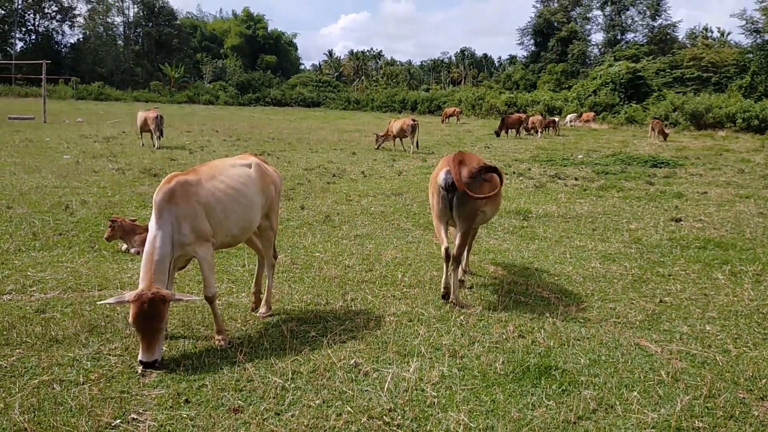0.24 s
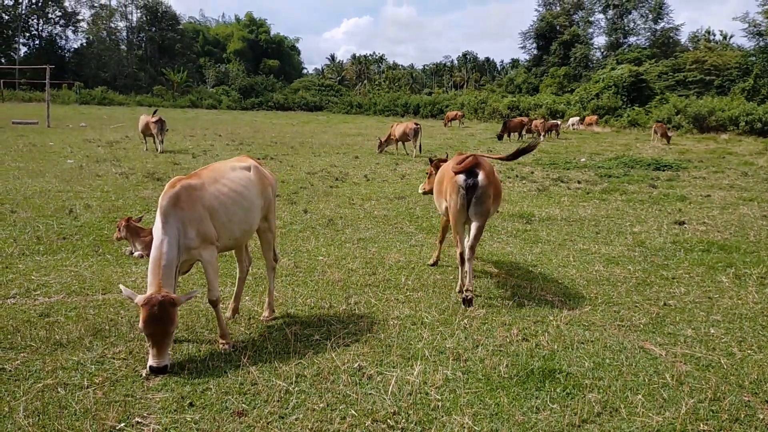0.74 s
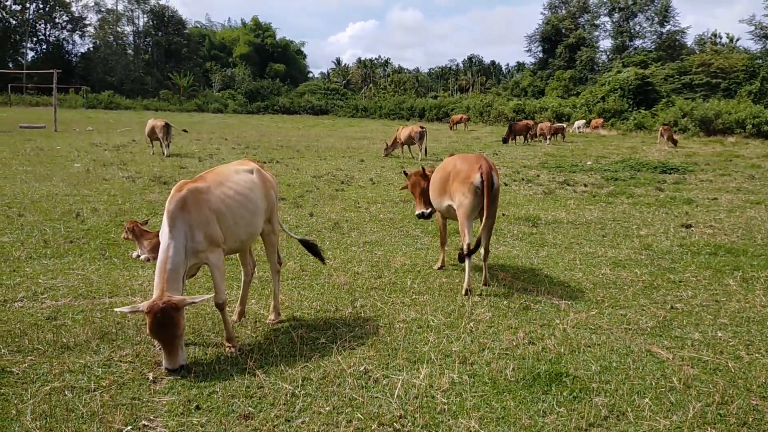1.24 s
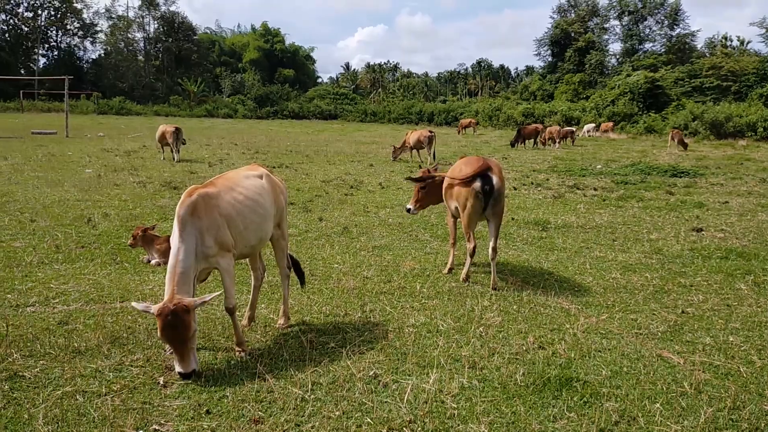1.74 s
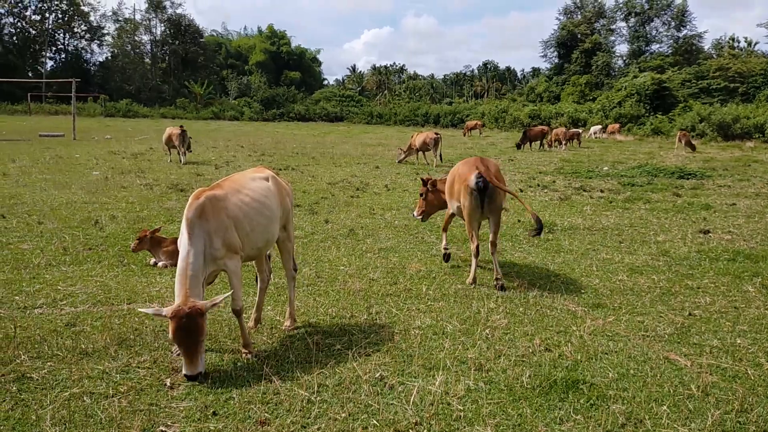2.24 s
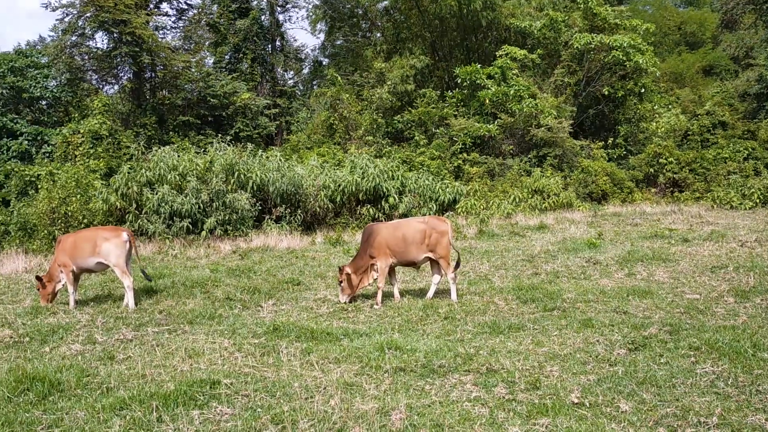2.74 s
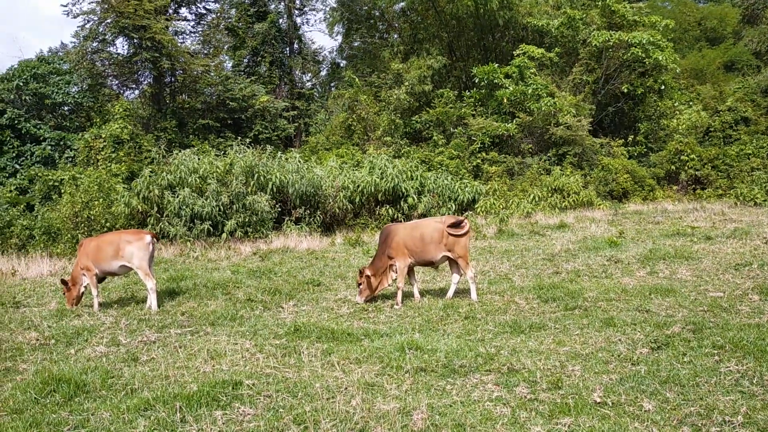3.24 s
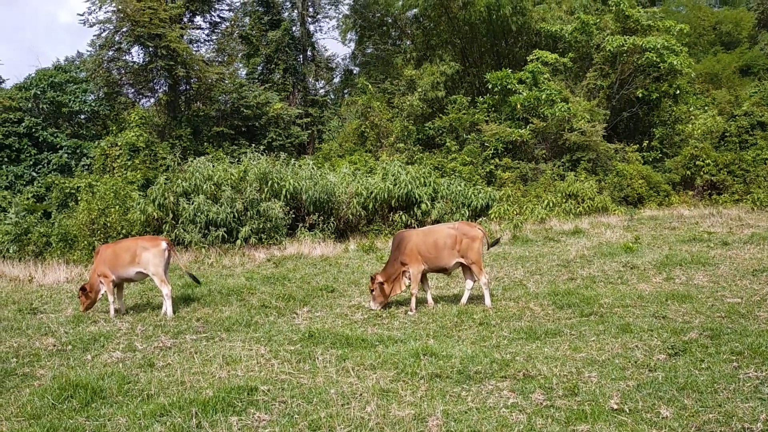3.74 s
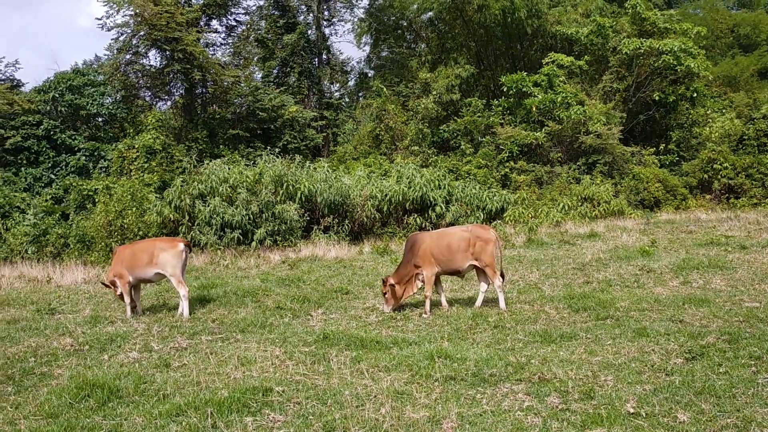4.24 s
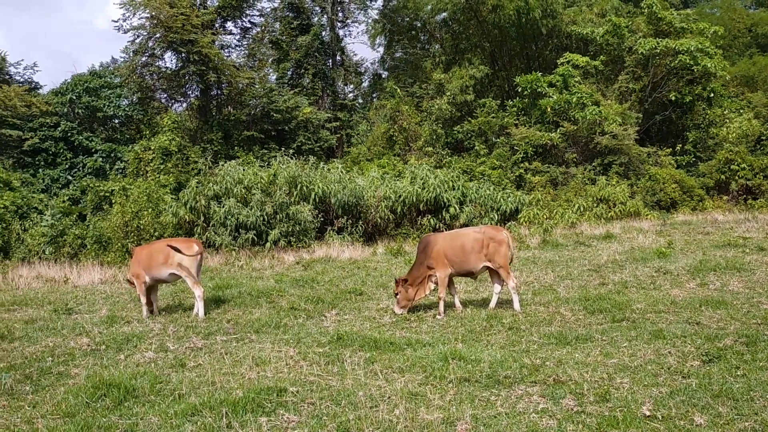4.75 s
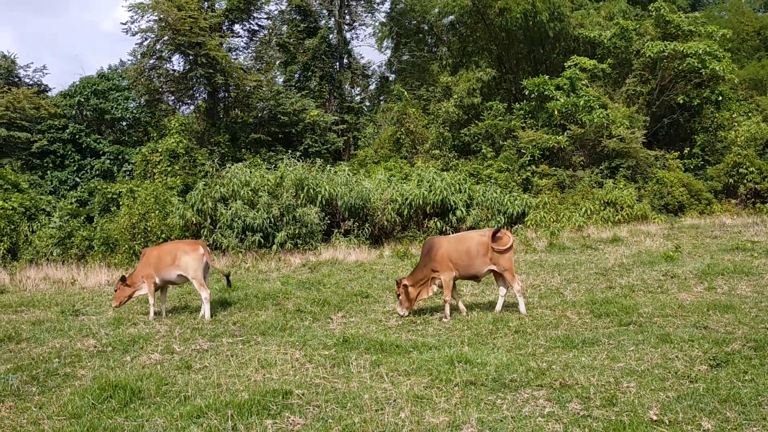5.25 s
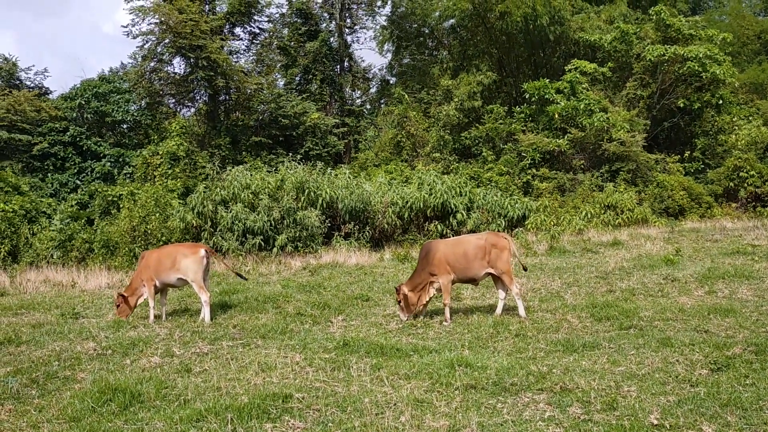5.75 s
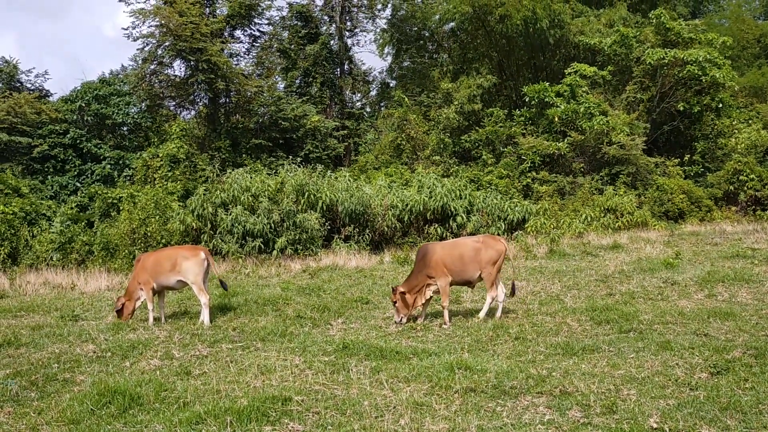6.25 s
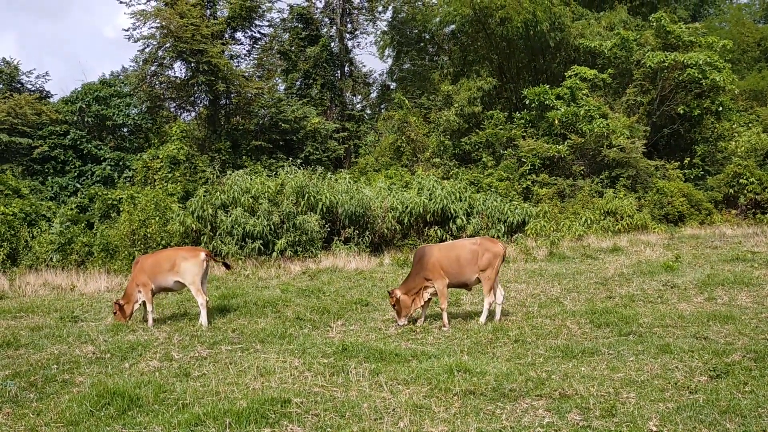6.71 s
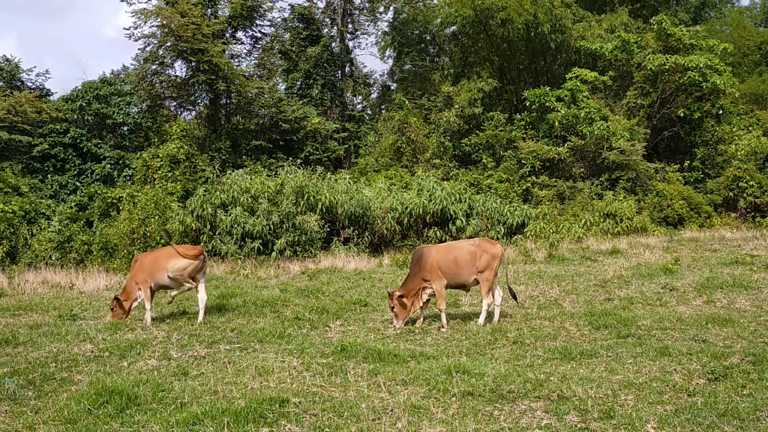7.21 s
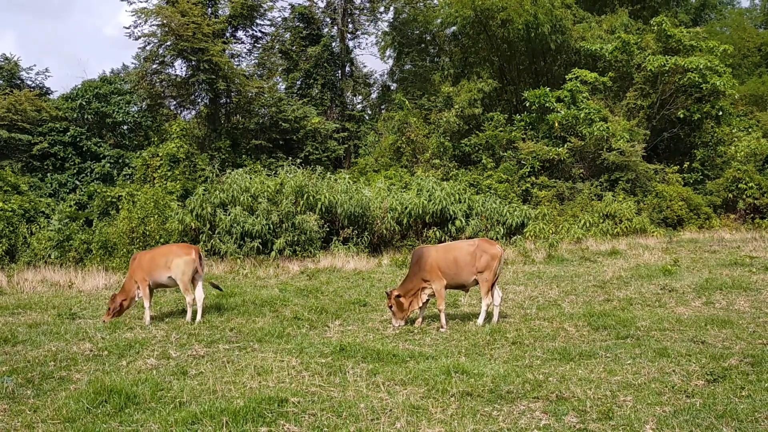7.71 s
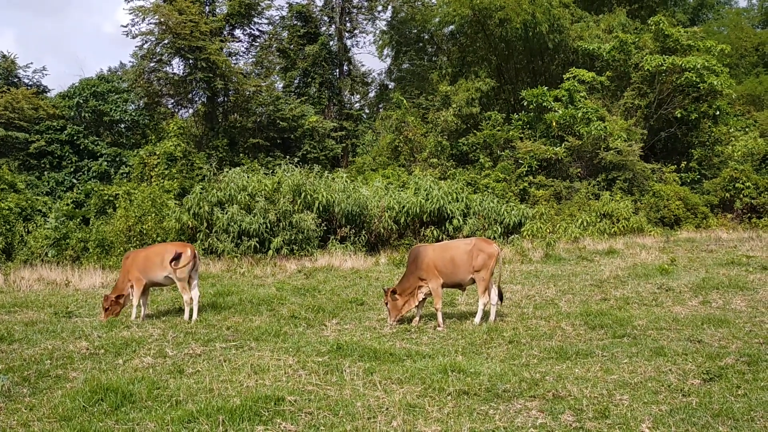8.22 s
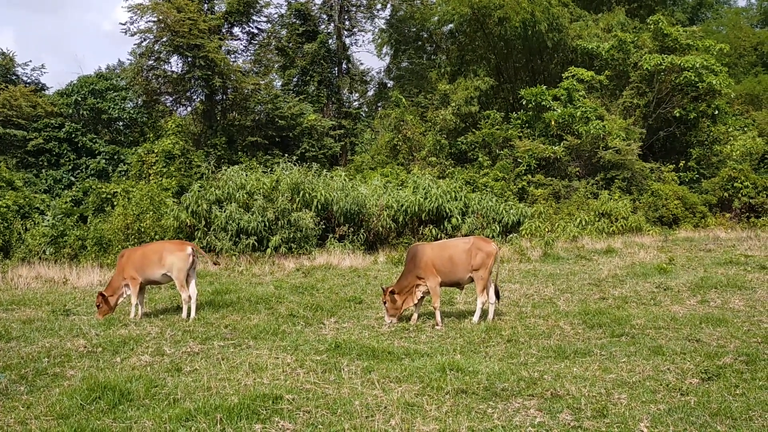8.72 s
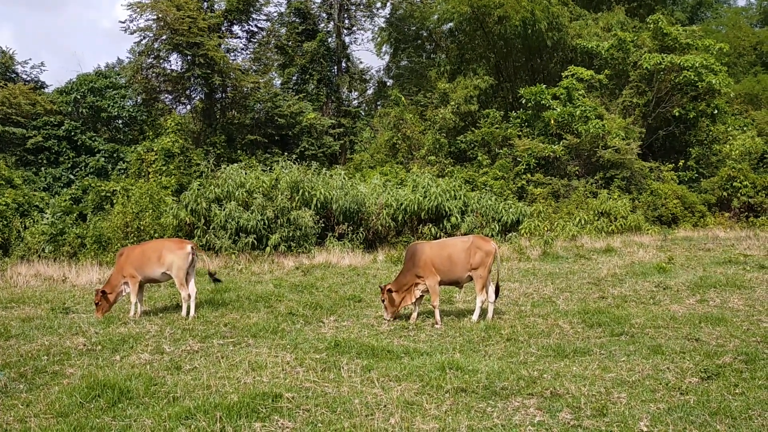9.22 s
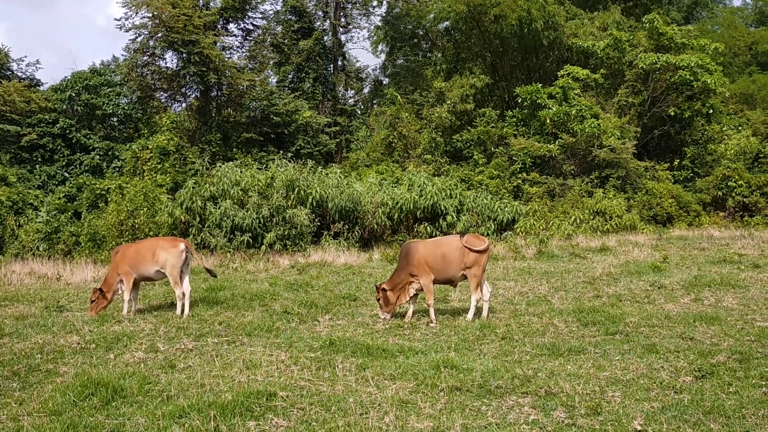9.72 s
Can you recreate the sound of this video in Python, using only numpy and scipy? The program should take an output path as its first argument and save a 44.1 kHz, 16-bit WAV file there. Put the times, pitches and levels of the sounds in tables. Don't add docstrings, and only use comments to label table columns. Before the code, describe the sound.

Cattle calls over a faint field background. The first moo is short, high and raspy, cut off by a grunt, its echo fading. Several seconds of near quiet follow, with dry steps, snapping straw, grass flicks and tiny distant birds in the centre. Two longer, deeper moos then come in close succession, the first starting through shut lips, and end in a rough sigh. The calls sound wide and reverberant, the pasture dry and centred.

```python
import sys
import numpy as np
from scipy import signal
from scipy.fft import rfft, irfft
from scipy.io import wavfile
from scipy.ndimage import uniform_filter1d

SR = 44100
rng = np.random.default_rng(int(sys.argv[2]) if len(sys.argv) > 2 else 0)


def undo_db(level):
    steps = np.asarray(level, float) / 20
    return 10 ** steps


def dump_mix(stems):
    frames = np.atleast_2d(stems).T
    limited = np.clip(frames, -1, 1)
    pcm = np.round(limited * 32767).astype(np.int16)
    wavfile.write(sys.argv[1], SR, pcm)


N = 439677
T = np.arange(N) / SR


def rms_one(x):
    return x / np.sqrt(np.mean(x ** 2) + 1e-20)


def columns(rows, t):
    time_s, *rest = np.transpose(rows)
    return [np.interp(t, time_s, column) for column in rest]


def at_hz(points, hz):
    points = np.array(points)
    return np.interp(np.log(hz), np.log(points[:, 0]), points[:, 1])


def wander(rate_hz, size):
    low = signal.butter(2, rate_hz, fs=SR, output="sos")
    drift = signal.sosfilt(low, rng.standard_normal(size + 9000))
    return rms_one(drift[9000:])


def resonance(x, hz, width_hz):
    r = np.exp(-np.pi * width_hz / SR)
    top = np.array([1, 0, -1]) * (1 - r * r) / 2
    return signal.lfilter(top, [1, -2 * r * np.cos(2 * np.pi * hz / SR), r * r], x)


def coloured(spectrum, channels):
    hz = np.arange(1, N // 2 + 2) * SR / N
    white = rfft(rng.standard_normal((channels, N)))
    return rms_one(irfft(white * undo_db(at_hz(spectrum, hz)), N))


def bursts(rows, noise, rise):
    shape = np.zeros(N)
    for start_s, level_db, t60_s in rows:
        i = round(start_s * SR)
        t = T[:min(SR // 2, N - i)]
        shape[i:i + len(t)] += undo_db(level_db - 60 * t / t60_s) * np.clip(t / rise, 0, 1)
    return shape * noise


# time_s, level_db
TRAFFIC_SWELLS = [(0, 8), (.6, 5), (2.32, 2.5), (3.08, 6), (3.41, 3), (4.07, 0), (4.31, 2.6), (10, 2.5)]
# pitch_hz, level_db (per Hz)
RUMBLE_COLOUR = [(12, -43), (20, 0.5), (97, -3.5), (118, -9), (178, -9.5), (259, -20.5), (390, -64.5),
                 (660, -120)]
AIR_COLOUR = [(150, -27), (250, -6.5), (692, -4.5), (1810, -9), (4870, -22), (7000, -18.5), (9100, -44.5),
              (15400, -120)]


def far_traffic():
    traffic_db, = columns(TRAFFIC_SWELLS, T)
    rumble = coloured(RUMBLE_COLOUR, channels=1)[0]
    air = coloured(AIR_COLOUR, channels=1)[0]
    rumble_db = -60.5 + traffic_db + 1.5 * wander(7.1, size=N)
    air_db = -69 + traffic_db + 1.0 * wander(23, size=N)
    return undo_db(rumble_db) * rumble + undo_db(air_db) * air


def insects():
    hz, width_hz, level_db = 8020, 900, -71
    chorus = resonance(resonance(rng.standard_normal(N), hz, width_hz), hz, width_hz)
    return undo_db(level_db + 1.5 * wander(20, size=N)) * rms_one(chorus)


# start_s, end_s, pitch_hz, level_db
ENGINES = [
    (0, 5.3, 74.8, -65),
    (0, 2.44, 160.3, -61),
    (0, 3.3, 202.5, -78),
    (5.098, 10.2, 93.4, -62.5),
]


def far_engines():
    out = np.zeros(N)
    for start_s, end_s, hz, level_db in ENGINES:
        heard = np.clip(np.minimum(T - start_s + 0.024, end_s - T) / 0.2, 0, 1)
        tone = resonance(resonance(rng.standard_normal(N), hz, 6.0), hz, 6.0)
        out += heard * undo_db(level_db) * rms_one(tone)
    return out


# start_s, level_db, hardness_db (hollow knock over ground thud)
STEPS = [(.081, -45, -2), (0.287, -56, 10.5), (.421, -56, 11), (2.397, -46.5, 4.5), (2.555, -56.5, 7.5),
         (2.587, -38, -2), (2.709, -46.5, 1), (2.953, -49, -21), (3.051, -52, 4), (3.09, -37.5, -20),
         (3.112, -29.5, 2), (3.139, -47.5, 2.5), (3.462, -42.5, 7.5), (3.636, -56.5, 4), (3.758, -43, -20),
         (3.789, -46, -7), (4.065, -45.5, -11), (4.142, -40, -8.5), (4.549, -55, -10)]
# start_s, level_db
SNAPS = [(2.557, -48), (3.053, -34.5), (3.114, -25.5), (3.431, -44), (3.452, -52.5), (3.219, -39.5),
         (3.503, -42), (3.635, -47.5), (4.879, -39.5)]


def hooves_and_stems():
    thuds = [(s, db) for s, db, hard_db in STEPS]
    knocks = [(s, db + hard_db) for s, db, hard_db in STEPS]
    snaps = [(s, db - 12) for s, db in knocks] + SNAPS
    start_s, level_db = np.transpose(knocks)
    contact = np.bincount(((start_s + 0.0033) * SR).astype(int), undo_db(level_db + 31), N)
    out = resonance(contact + 1e-18, 725, 210)
    ranges = [(140, 520, .07), (450, 2500, .018), (3000, 17000, .008)]
    for rows, (low_hz, high_hz, t60_s) in zip((thuds, knocks, snaps), ranges):
        band = signal.butter(2, [low_hz, high_hz], "band", fs=SR, output="sos")
        noise = rms_one(signal.sosfilt(band, rng.standard_normal(N)))
        hits = [(s + 0.00072, db - 4.5, t60_s) for s, db in rows]
        out = out + bursts(hits, noise, rise=0.0013)
    return out


# pitch_hz, level_db (per Hz)
GRASS_COLOUR = [(5290, -44), (9000, -23.5), (10200, -17.5), (11700, -13), (14500, -2.5), (15400, 2),
                (16000, -23)]
# time_s, level_db (peak)
BRUSHES = [(0.3552, -37.5), (0.9981, -47), (1.498, -38), (2.0656, -43), (2.451, -45), (2.5558, -45),
           (3.1173, -45), (3.4536, -40.5), (4.6074, -53), (4.881, -38), (5.7357, -40), (6.338, -40.5),
           (6.484, -40.5), (6.626, -34), (6.7175, -40), (7.2355, -49.5), (7.364, -38.5), (7.6146, -39),
           (7.847, -39), (8.1147, -50), (8.249, -42), (8.4065, -52.5), (9.0717, -42.5), (9.188, -45),
           (9.435, -48.5), (9.5652, -48), (9.7223, -45)]
# time_s, level_db (peak)
BLADES = [(0.3556, -40.5), (0.6365, -57), (0.9975, -46.5), (1.3394, -40.5), (2.4504, -45), (2.5555, -39.5),
          (2.7122, -55), (3.053, -44.5), (3.1146, -25), (3.4304, -55), (3.4517, -40.5), (3.4645, -34),
          (3.5039, -37), (3.6002, -55.5), (3.6249, -56.5), (3.691, -51), (3.7126, -52), (4.1057, -53.5),
          (4.1924, -56.5), (4.5166, -56.5), (4.6087, -78), (4.607, -45.5), (4.8185, -48.5), (4.8519, -42),
          (4.8803, -38.5), (4.9806, -50.5), (5.36, -56), (5.5824, -51), (5.7762, -36), (5.8227, -52.5),
          (5.9464, -49.5), (6.338, -40.5), (7.2359, -48.5), (7.613, -46.5), (7.6201, -39), (7.8467, -35),
          (8.1143, -53), (8.2483, -38), (8.7749, -46), (8.9377, -46), (8.982, -50), (9.0689, -48),
          (9.0915, -43.5), (9.1139, -44), (9.1281, -39.5), (9.189, -38.5), (9.5636, -53), (9.6465, -49),
          (9.6567, -42), (9.7218, -46)]


def grass():
    hiss = coloured(GRASS_COLOUR, channels=1)[0]
    crackling = hiss * undo_db(3.0 * wander(400, size=N))
    brushes = [(s - .04, db - 17, .45) for s, db in BRUSHES]
    flicks = [(s, db - 4, .012) for s, db in BLADES]
    out = undo_db(-67.5 + 1.5 * wander(12, size=N)) * hiss
    out += bursts(brushes, crackling, rise=0.045)
    return out + bursts(flicks, hiss, rise=.001)


# start_s, level_db, t60_s
RUSTLES = [
    (.38, -53.5, 0.46),
    (2.7, -58, 0.68),
    (3.76, -55, 0.23),
    (4.14, -60.5, 0.74),
]


def muzzle_rustles():
    noise = rms_one(resonance(rng.standard_normal(N), 950, 550.0))
    return bursts(RUSTLES, noise, rise=.015)


def pasture():
    return far_traffic() + insects() + far_engines() + hooves_and_stems() + grass() + muzzle_rustles()


def fold_pulses(t, pitch, phase, rough, odd_share):
    odd = np.minimum(odd_share + .8 * rough, 1)
    knots = np.arange(t[0], t[-1] + 1, 1 / 6)
    swell = undo_db(2 * rng.standard_normal((70, len(knots))))
    pulses = np.zeros(len(t))
    for k in range(2, 70):
        share = 1
        if k % 2:
            share = odd if k < 4 else np.minimum(2.5 * odd, 1)
        pulses += np.interp(t, knots, swell[k]) * np.cos(k * phase) * share * (k * pitch < 7000)
    flutter = np.cos(phase / 2 + 1.2 * wander(8, size=len(t)))
    pulses = pulses * (1 + rough * (1.9 * flutter + wander(120, size=len(t))))
    breath = 2.0 * rough * rng.standard_normal(len(t)) * (1 + np.cos(2 * phase))
    return pulses + breath


def throat(source, modes, t, tongue):
    out = 0
    for hz, width_hz, first_db, second_db, third_db in modes:
        level_db = np.interp(t, tongue, [first_db, second_db, second_db, third_db])
        ringing = resonance(source, hz, .7 * width_hz)
        out = out + undo_db(level_db) * resonance(ringing, hz, 2.4 * width_hz)
    return out


# pitch_hz, width_hz, then level_db in the first, second and third shape
THROAT_SHUT = [(208, 110, 15, 7, 7), (620, 100, 1.5, .5, .5), (1000, 31, 3, 6, 6), (1553, 60, -4.5, -6, -6),
               (1900, 120, -13, -16, -16), (2390, 170, -8.5, -15, -15), (2707, 41, -1.5, 1, 1),
               (3970, 570, -14, -14.5, -14.5), (4970, 850, -21, -24, -24)]
# time_s, level_db, half_width_s
CHEST_DIPS = [
    (6.49, -9, 0.044),
    (6.9, -16, 0.06),
    (7.25, -27, 0.036),
    (7.448, -18, 0.027),
    (8.275, -5, 0.029),
    (8.417, -16.5, 0.019),
    (8.499, -7, 0.023),
    (8.653, -23, 0.027),
]


def call(rows, grain, odd_share, balance, modes, opens_s, dip_hz, tongue):
    t = T[round(rows[0][0] * SR):round(rows[-1][0] * SR)]
    pitch, chest_db, opening_db = columns(rows, t)
    rough, = columns(grain, t)
    pitch = uniform_filter1d(pitch, size=1500, mode="nearest")
    uneven_pitch = pitch * (1 + .07 * rough * wander(60, size=len(t)))
    phase = 2 * np.pi * np.cumsum(uneven_pitch) / SR
    source = fold_pulses(t, pitch, phase, rough, odd_share)

    lips = np.clip((t - opens_s) * 60, 0, 1)
    voiced = lips * throat(source, modes, t, tongue)
    voiced = voiced + (1 - lips) * throat(source, THROAT_SHUT, t, tongue)

    chest_dip_db = sum(db * np.exp(-((t - s) / width) ** 2) for s, db, width in CHEST_DIPS)
    mouth_db, base_db, climb_db = balance
    mouth_db = chest_db + mouth_db + opening_db + 7 * (1 - lips)
    base_db = mouth_db + base_db + climb_db * np.log2(pitch / pitch[0]) + 14 * (1 - lips)
    out = undo_db(base_db) * np.sqrt(2) * np.sin(phase)
    registers = [(170, 480, chest_db + chest_dip_db), (480, 1400, mouth_db), (1400, 8000, chest_db + opening_db)]
    for low_hz, high_hz, level_db in registers:
        band = signal.butter(2, [low_hz, high_hz], "band", fs=SR, output="sos")
        part = signal.sosfiltfilt(band, voiced)
        out += undo_db(level_db) * part / np.sqrt(uniform_filter1d(part ** 2, size=2500) + 1e-9)

    out -= 0.52 * resonance(out, dip_hz, 100.0)
    edge = np.clip(np.minimum(t - t[0], t[-1] - t) / .006, 0, 1)
    return np.interp(T, t, out * edge, 0, 0)


# pitch_hz, t60_s
WALL_T60 = [(60, 0.93), (250, 0.63), (1000, 0.64), (3000, 0.8), (8000, 0.16)]


def walls():
    t, out = T[:SR], 0
    for low_hz in 40 * 2 ** np.arange(0, 8., .5):
        band = signal.butter(2, [low_hz, low_hz * np.sqrt(2)], "band", fs=SR, output="sos")
        mid, side = signal.sosfilt(band, rng.standard_normal((2, SR)))
        apart = np.clip(low_hz / 900, 0, .8)
        stereo = mid + apart * side * np.array([[1], [-1]])
        dull_db = -3.5 * max(np.log2(low_hz / 400), 0)
        out = out + stereo * undo_db(-60 * t / at_hz(WALL_T60, low_hz) + dull_db)
    out = out * np.clip((t - .008) / 0.012, 0, 1)
    return out / np.sqrt(np.sum(out ** 2) / 2)


def placed(x, echo, lag, pan_db, echo_db):
    left = np.interp(T - lag / SR, T, x) * undo_db(pan_db / 2)
    direct = np.array([left, x * undo_db(-pan_db / 2)])
    bright = signal.sosfilt(signal.butter(1, 450, "high", fs=SR, output="sos"), x)
    late = np.interp(T - .0043, T, bright)
    bounce = undo_db(-14) * np.array([late, -late])
    wet = signal.fftconvolve(x[None], echo, axes=1)[:, :N]
    return direct + bounce + undo_db(echo_db) * wet


# time_s, pitch_hz, effort_db, opening_db (treble lift of the open mouth)
RISE = [
    (.626, 119.7, -45.5, -1.5),
    (0.646, 124.9, -41.5, -4.5),
    (0.718, 133, -27, -13.5),
    (0.803, 144.3, -25.5, -10),
    (0.859, 150.2, -27, -8.5),
    (0.9, 155.3, -27.5, -5),
    (0.97, 167.6, -27.5, -10),
]
BREAK = [
    (.96, 136.3, -19.5, -15.5),
    (1.05, 136.8, -23, -9.5),
    (1.072, 139.4, -14, -14),
    (1.104, 144.5, -23, -17.5),
    (1.125, 148.1, -16, -8.5),
    (1.158, 149, -24, -13),
    (1.185, 153.7, -20.5, -15),
    (1.23, 161.6, -26.5, -9),
]
BELLOW = [
    (1.302, 169.8, -21.5, -10),
    (1.36, 171.4, -18.5, -16),
    (1.42, 172.9, -23.5, -8.5),
    (1.471, 171.8, -19, -14),
    (1.54, 177.7, -27.5, -3.5),
    (1.632, 189, -25, -9.5),
    (1.701, 189.2, -27.5, -5.5),
    (1.89, 188.1, -30, -6.5),
    (1.955, 177.5, -30.5, -8.5),
]
GRUNT = [
    (1.949, 160.7, -17.5, -15),
    (1.987, 135.5, -9.5, -17.5),
    (2.041, 115.6, -23, -29),
]
HUMMED = [
    (6.135, 99.8, -65, 4),
    (6.15, 99.7, -65, 6.5),
    (6.189, 101.5, -46, -2),
    (6.3, 106.6, -36, -6.5),
    (6.409, 112.9, -35, -4.5),
]
LONG = [
    (6.451, 114.9, -35, 5),
    (6.601, 119.1, -24, -3.5),
    (6.7, 121.9, -19.5, -6),
    (6.851, 125.4, -21, -3.5),
    (6.97, 127.2, -26, 3),
    (7.159, 126.9, -24.5, 1.5),
    (7.272, 125, -25, -2),
    (7.371, 120.2, -19.5, -8.5),
    (7.461, 114.5, -33.5, 4),
]
FADING = [
    (7.54, 106.3, -31.5, -1),
    (7.58, 95.6, -28.5, -12),
    (7.629, 87.8, -36, -15.5),
]
DRAWN = [
    (7.66, 89.4, -65, 11),
    (7.812, 96.43, -37, -21),
    (7.95, 104.1, -37.5, -19),
    (8.121, 113.4, -33.5, -21.5),
]
ANSWER = [
    (8.147, 114.7, -33, -5),
    (8.232, 117.8, -23.5, -11),
    (8.36, 125.7, -23, -12.5),
    (8.449, 132.8, -23, -10),
    (8.561, 138.3, -20.5, -12.5),
    (8.68, 141.2, -17.5, -17.5),
    (8.869, 144.1, -21, -18),
    (8.929, 137.9, -27.5, -9),
    (9.037, 122.8, -24.5, -16),
]
DYING = [
    (9.08, 120.8, -39.5, -13),
    (9.125, 122.4, -31.5, -19),
    (9.168, 124, -53, -12),
]
SIGH = [
    (9.15, 100.6, -42, -23),
    (9.251, 92.7, -47, -18),
    (9.36, 87.2, -42, -11.5),
    (9.43, 86.3, -43, -29),
]
# pitch_hz, width_hz, then level_db in the first, second and third shape of the call
THROAT_RISE = [(274, 150, -2, 3.5, 3), (528, 120, -11.5, -14.5, -9), (844, 160, -6.5, -10.5, -5.5),
               (1150, 57, 10.5, 4.5, -5), (1242, 60, -1.5, 7.5, 5.5), (1664, 74, -11.5, -3, -13),
               (1770, 74, -15.5, -1.5, -1.5), (1980, 130, -5.5, -11, -11.5), (2250, 160, -10, -1, -5),
               (2770, 240, -12.5, -8.5, -3), (3250, 140, -31, -22, -15.5), (3950, 200, -37, -27.5, -22)]
THROAT_BELLOW = [(290, 260, 2, 5.5, 3.5), (554, 100, -4, -12.5, -15), (733.5, 45, -7, 0, -14),
                 (869, 110, 5.5, 6.5, 2), (939, 30, 1.5, 0, -1.5), (1141, 140, 2, -7.5, -5),
                 (1606, 88, 1, 6.5, 8), (1977, 99, -4.5, -4, -1.5), (2559, 110, -16.5, -11, 3.5),
                 (2746, 200, -9.5, -7.5, 4.5), (3370, 80, -21, -23.5, -26.5), (3470, 120, -23.5, -29, -43),
                 (4170, 120, -28.5, -35.5, -43)]
THROAT_LONG = [(251, 93, 12.5, 13, 13.5), (675, 190, -11.5, -4, -5.5), (876.4, 112, -9.5, 1, -1),
               (963, 44, -4.5, -4.5, -2), (1339, 146, -3, 2, 1.5), (1633, 112, 0, 5, 0),
               (2157, 207, -2, -1, -3.5), (2313, 176, 3.5, -3, -1), (3074, 150, -1.5, -12, -5),
               (3250, 130, -13.5, -7.5, -14.5), (3930, 160, -8.5, -13, -12.5),
               (4660, 200, -12.5, -13.5, -19), (5200, 150, -18.5, -15, -20.5), (5970, 380, -17, -23.5, -23)]
THROAT_ANSWER = [(263.8, 78.7, 17, -1.5, 2), (580, 29, -5.5, -20, 1), (692, 107, -3, -4, -2.5),
                 (823, 83, 0.5, -1, 1), (993, 55, -4, 3.5, 2), (1060, 62, 8, -21, 2.5),
                 (1282, 38, 2.5, 2, -3), (1362, 61, 5, 6, -1), (1778, 96, -8.5, -4.5, -13),
                 (2200, 86, -0.5, -3.5, -12.5), (2574, 74, -7, -14, -13), (3170, 98, -18.5, -22, -23.5)]
THROAT_SIGH = [(244.3, 84, 6, 0, 0), (577, 65, -3, -1, 3), (920, 51, -6, 2, 3), (1209, 200, -12, -11, -6),
               (1700, 140, -12, -14, -17), (2240, 150, -19, -20, -17)]
# time_s, roughness (0-1)
ROUGHNESS = [
    [(.92, .003), (.97, .5)],
    [(1.045, .5), (1.065, .1), (1.16, .08), (1.19, .33), (1.55, .36), (1.65, .27), (1.75, .18), (1.95, .14)],
    [(1.96, .15), (1.99, .2), (2.01, .6)],
    [(6.1, .012), (6.5, .004), (6.85, .002), (7.24, .003), (7.35, .03), (7.47, .09), (7.6, .25)],
    [(7.66, .14), (8.1, .05), (8.3, .09), (8.5, .07), (8.6, .012), (8.87, .012), (8.95, .08), (9.02, .4),
     (9.2, .55)],
    [(9.1, .5), (9.4, .35)],
]
ODD_SHARE = [1, 0, .2, 1, 1, 1]
# mouth_db, fundamental_db, climb_db (fundamental, per octave of pitch)
BALANCE = [
    (11, -17.5, 47.5),
    (10, -24, 4),
    (1, -10.5, -35),
    (-2.1, -8, -7.5),
    (5, -13, 11),
    (12, 3, -6),
]
LIPS_OPEN_S = [0, 0, 0, 6.42, 8.135, 0]
NOSE_DIP_HZ = [676, 2370, 2242, 526, 417, 417]
# first_until_s, second_from_s, second_until_s, third_from_s
TONGUE = [
    (0.69, 0.766, 0.84, 0.84),
    (1.184, 1.24, 1.7, 1.55),
    (0.997, 1.105, 1.2, 1.8),
    (6.798, 6.924, 7.1, 7.32),
    (8.519, 8.58, 8.88, 8.95),
    (9.198, 9.25, 8.4, 10.6),
]
LEFT_LAGS = [21, 21, 21, -3, -10, -10]
# pan_db (left over right), echo_db
SIDES = [
    (1, -12.5),
    (0, -9),
    (1, -15),
    (-0.6, -10),
    (-2.5, -8),
    (-2, -9),
]


def cattle(echo):
    calls = RISE, BREAK + BELLOW, GRUNT, HUMMED + LONG + FADING, DRAWN + ANSWER + DYING, SIGH
    throats = THROAT_RISE, THROAT_BELLOW, THROAT_BELLOW, THROAT_LONG, THROAT_ANSWER, THROAT_SIGH
    settings = zip(calls, ROUGHNESS, ODD_SHARE, BALANCE, throats, LIPS_OPEN_S, NOSE_DIP_HZ, TONGUE)
    voices = [call(*each) for each in settings]
    return sum(placed(voice, echo, lag, *side) for voice, lag, side in zip(voices, LEFT_LAGS, SIDES))


# start_s, level_db (peak), pitch_hz, t60_s
THUDS = [(1.799, -14, 58.4, 0.044), (6.431, -26, 222, 0.11), (7.161, -26, 49.6, 0.2),
         (8.235, -25, 1060, 0.071), (8.961, -31, 58.7, 0.57), (9.201, -31.5, 89.7, 0.94),
         (9.5, -27, 68, .5), (9.44, -19.5, 131.4, 0.41), (9.458, -20, 211, 0.12), (9.482, -34.5, 408, 0.34),
         (1.995, -19.5, 187.3, 0.27)]


def thuds_and_rumbles():
    out = np.zeros(N)
    for start_s, level_db, hz, t60_s in THUDS:
        t = np.clip(T - start_s, 0, None)
        out += undo_db(level_db - 60 * t / t60_s) * np.sin(2 * np.pi * hz * t) * np.clip(t / 0.0013, 0, 1)
    return out


def birds(notes):
    out = np.zeros(N)
    for start_s, length_s, from_hz, to_hz, level_db in notes:
        u = np.linspace(0, 1, round(length_s * SR))
        quaver = 1 + .015 * np.sin(2 * np.pi * 45 * length_s * u)
        hz = (from_hz + (to_hz - from_hz) * u) * quaver
        tone = np.sin(2 * np.pi * np.cumsum(hz) / SR)
        out[round(start_s * SR):][:len(u)] += undo_db(level_db) * tone * np.sin(np.pi * u) ** .6
    return out


# start_s, length_s, start_hz, end_hz, level_db
FAR_BIRDS = [(2.7, .06, 5850, 5850, -74), (2.8, .08, 5200, 4850, -74), (2.99, .028, 3650, 4350, -66),
             (3.018, .02, 4200, 4750, -63), (2.993, .025, 5600, 6500, -67), (3.058, .11, 3550, 4850, -64),
             (3.16, .055, 5000, 6000, -68), (4.54, .06, 3500, 4200, -74), (4.615, .11, 3450, 4400, -65),
             (4.715, .045, 4300, 5700, -64), (6.1, .05, 7800, 6300, -62)]


def pasture_birds(echo):
    whistles = birds(FAR_BIRDS)
    return whistles + undo_db(-9) * signal.fftconvolve(whistles, echo[0])[:N]


# start_s, start_hz, end_hz, level_db
CHIRPS = [(7.605, 4900, 4200, -55), (7.625, 4200, 3100, -48), (7.69, 5600, 4900, -52),
          (7.725, 5400, 4700, -52), (7.755, 4500, 3200, -46), (7.79, 3300, 2700, -51),
          (7.82, 4500, 3600, -54), (8.73, 4100, 5300, -60), (8.872, 4700, 3700, -47),
          (9.19, 4700, 4300, -57), (9.24, 4300, 5900, -53), (9.29, 4200, 3500, -54),
          (9.35, 6100, 5400, -58), (9.39, 4700, 4300, -56), (9.42, 4900, 3700, -57),
          (9.445, 3500, 2400, -47)]


def yard_birds():
    return undo_db(3) * birds([(start_s, .035, *rest) for start_s, *rest in CHIRPS])


# opens_s, gone_s, fade_s, first_air_db, last_air_db
YARD_TIMES = [
    (0.63, 2.301, 0.31, -45, -30),
    (6.139, 9.658, 0.44, -39.5, -42),
]
# pitch_hz, level_db (per Hz)
YARD_AIR = [(25, -9.5), (60, 0), (130, -11.5), (400, -16), (1500, -22.5), (4000, -35), (8000, -43),
            (15000, -52.5)]


def yard(echo):
    sources = cattle(echo) + placed(yard_birds(), echo, 1, 0.4, 3) + placed(thuds_and_rumbles(), echo, 1, 0.4, -10)
    mid, side = coloured(YARD_AIR, channels=2)
    air = undo_db(1.3 * wander(8, size=N)) * (mid + 0.7 * side * np.array([[1], [-1]]))
    out = 0
    for opens_s, gone_s, fade_s, first_db, last_db in YARD_TIMES:
        heard = np.clip(np.minimum((T - opens_s) * 80, (gone_s - T) / fade_s), 0, 1)
        air_db = np.interp(T, [opens_s, gone_s], [first_db, last_db])
        out = out + heard * (sources + air * undo_db(air_db))
    return out


def scene():
    echo = walls()
    return pasture() + yard(echo) + pasture_birds(echo)


def top_cut(x):
    return signal.sosfilt(signal.butter(12, 15830, fs=SR, output="sos"), x)


def record(dry):
    return top_cut(dry)


dry = scene()
out = record(dry)
dump_mix(out)
```